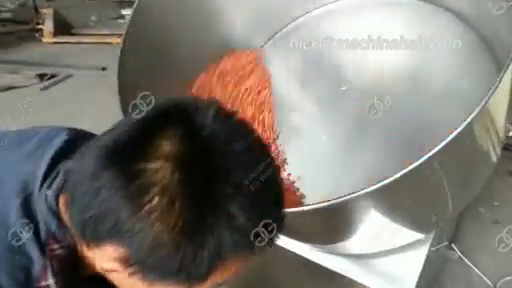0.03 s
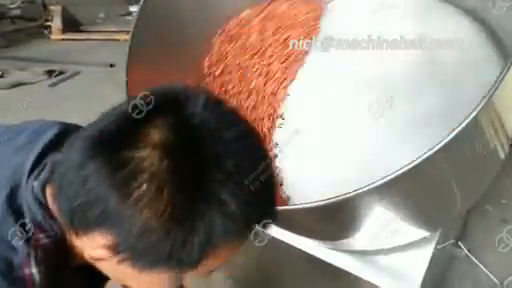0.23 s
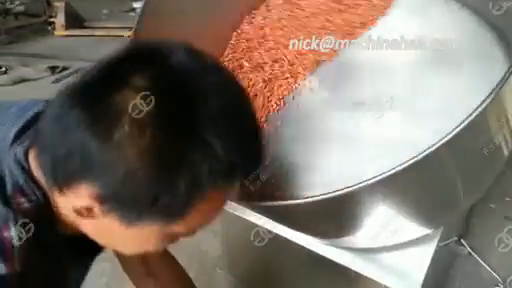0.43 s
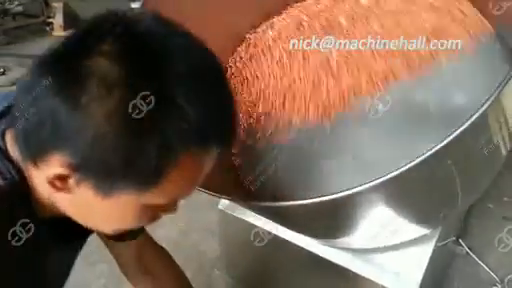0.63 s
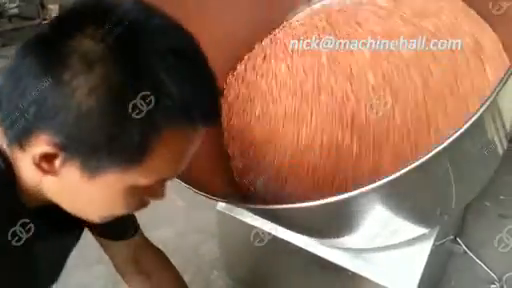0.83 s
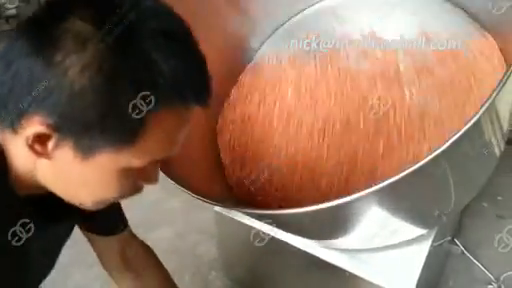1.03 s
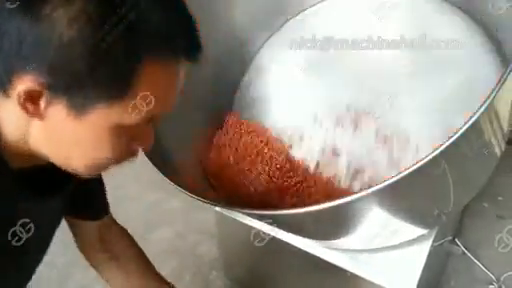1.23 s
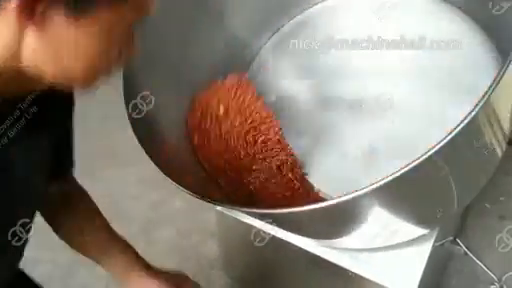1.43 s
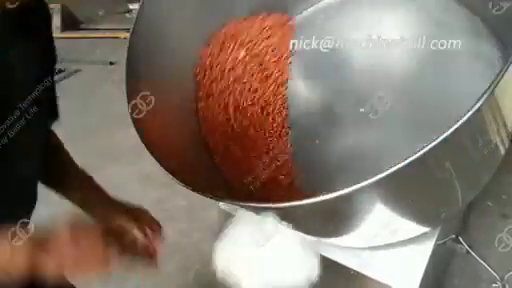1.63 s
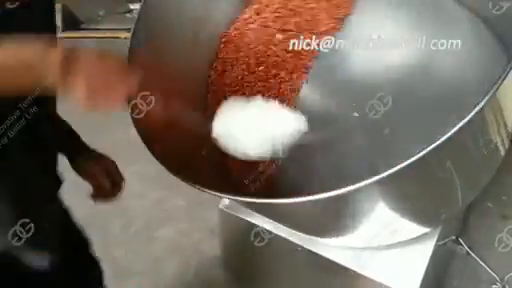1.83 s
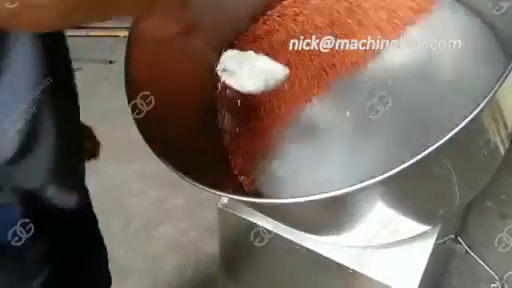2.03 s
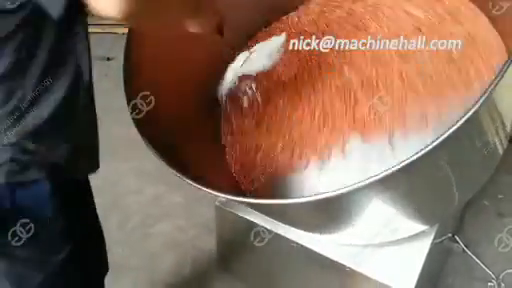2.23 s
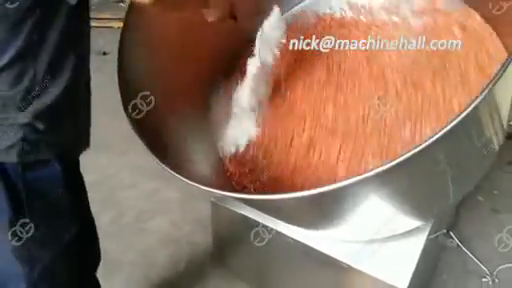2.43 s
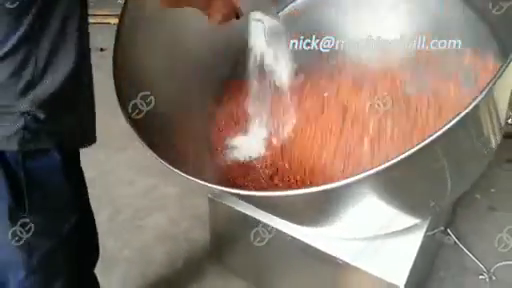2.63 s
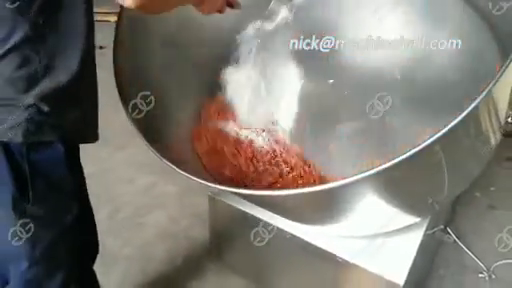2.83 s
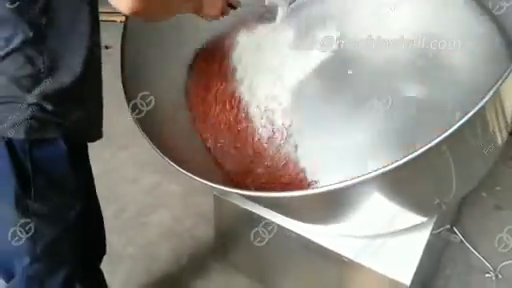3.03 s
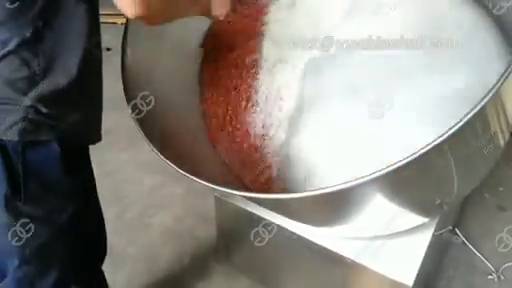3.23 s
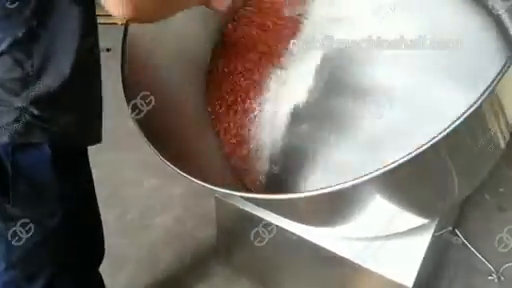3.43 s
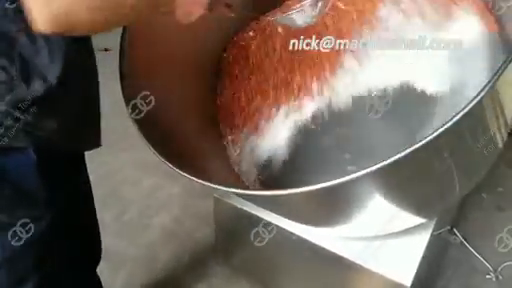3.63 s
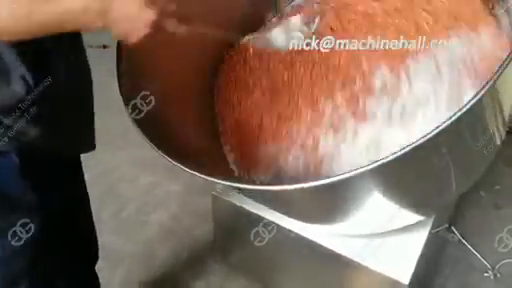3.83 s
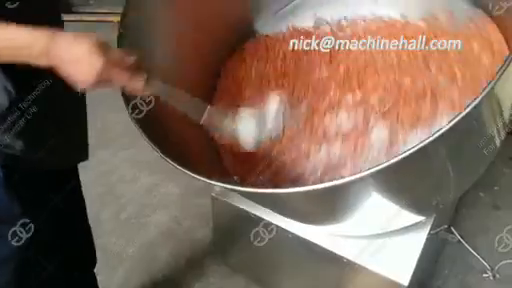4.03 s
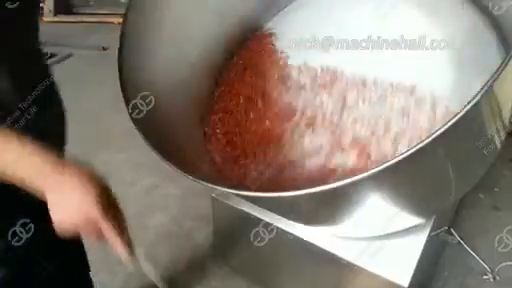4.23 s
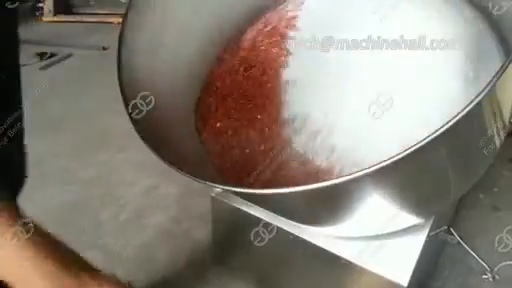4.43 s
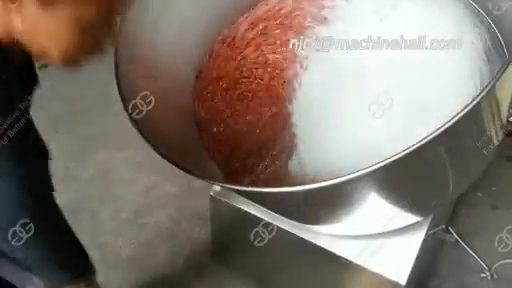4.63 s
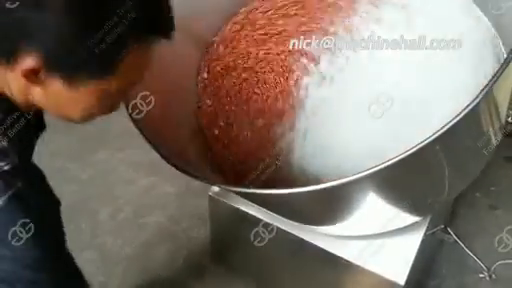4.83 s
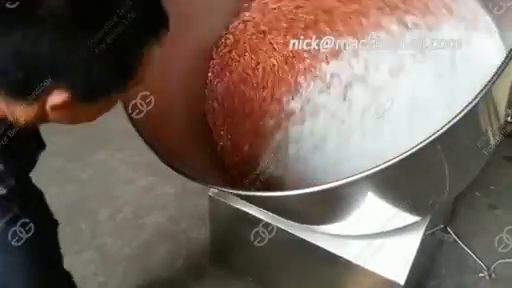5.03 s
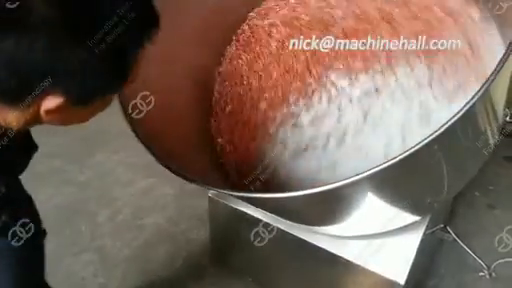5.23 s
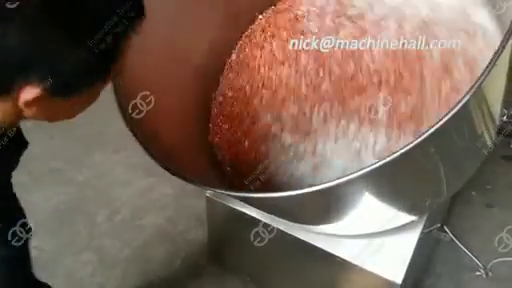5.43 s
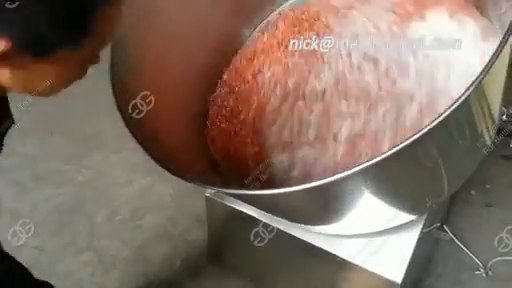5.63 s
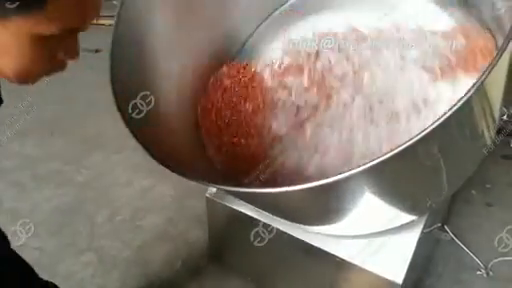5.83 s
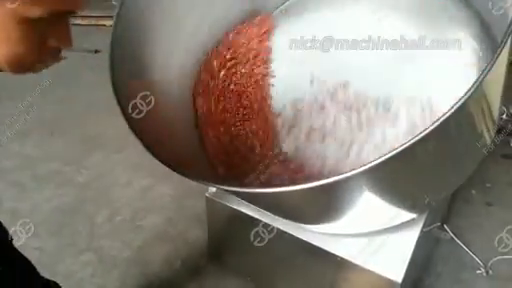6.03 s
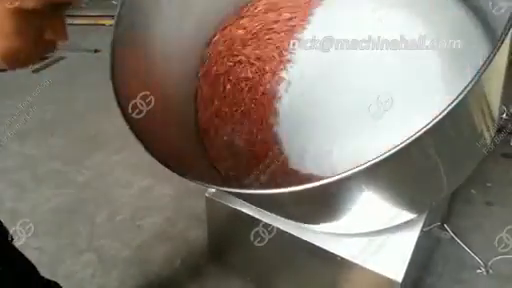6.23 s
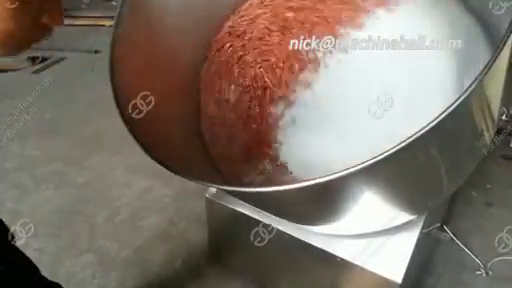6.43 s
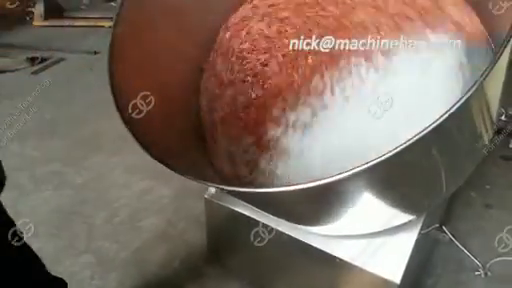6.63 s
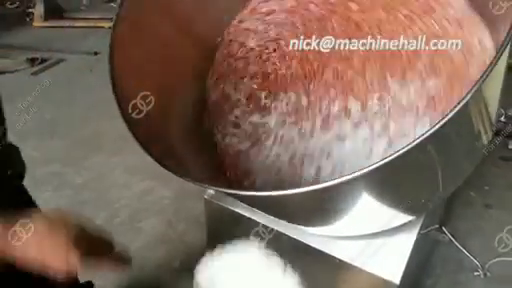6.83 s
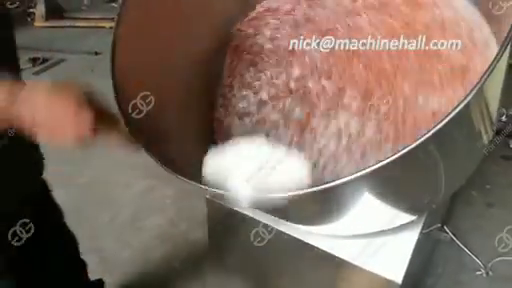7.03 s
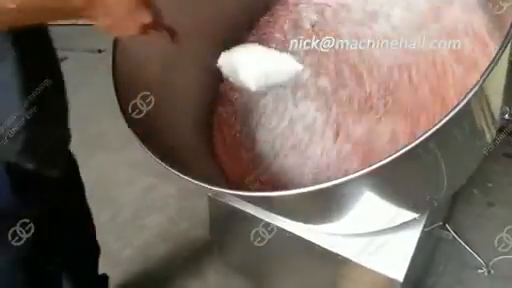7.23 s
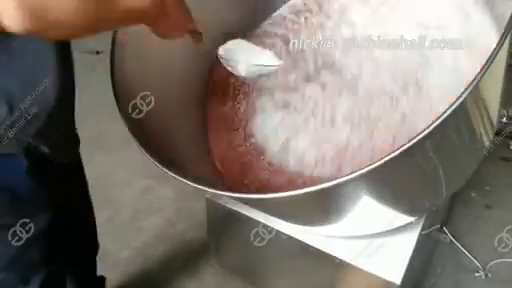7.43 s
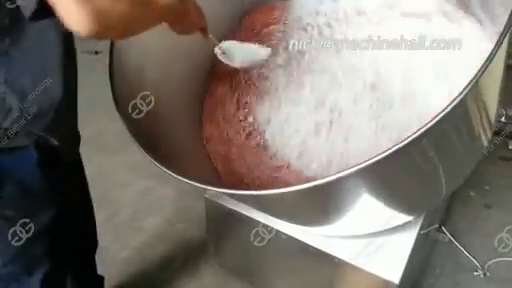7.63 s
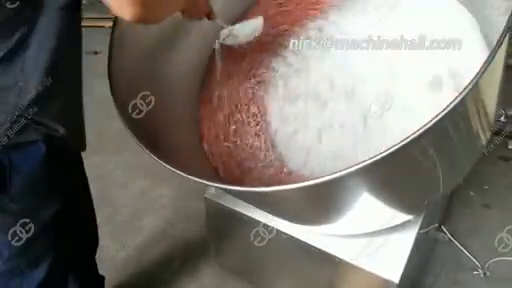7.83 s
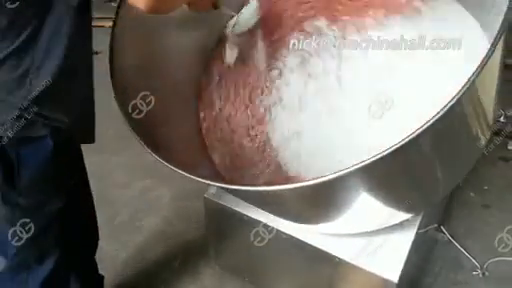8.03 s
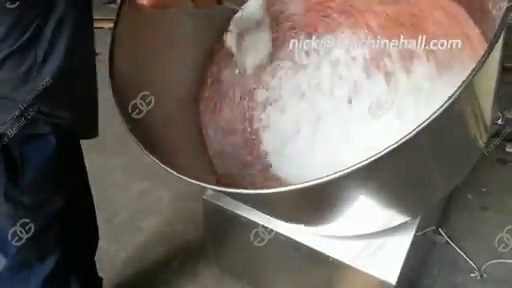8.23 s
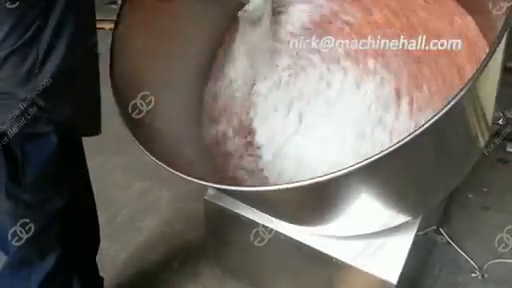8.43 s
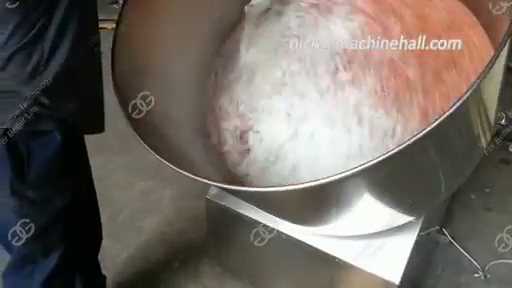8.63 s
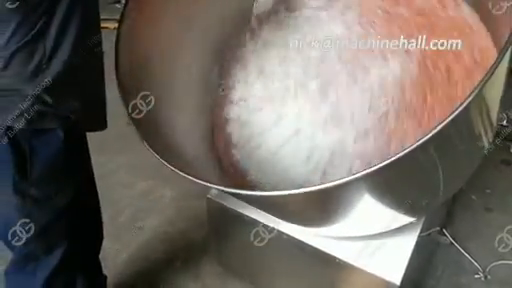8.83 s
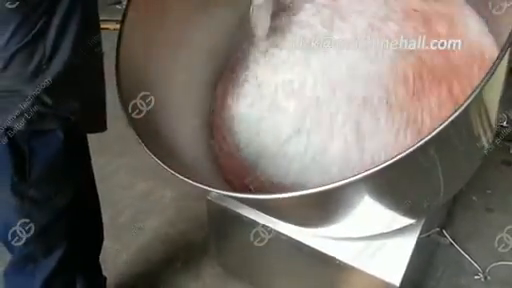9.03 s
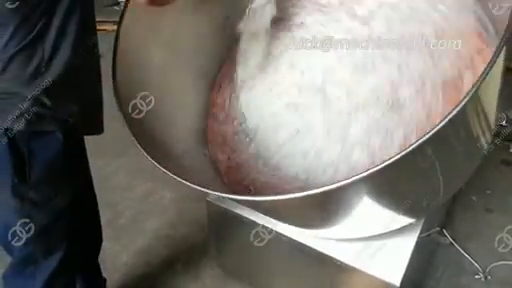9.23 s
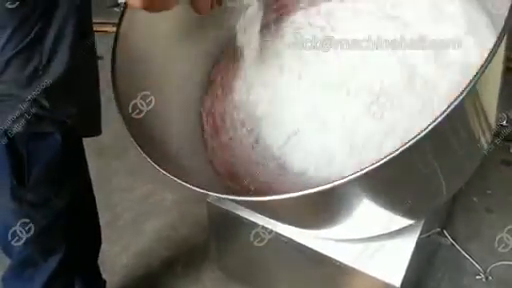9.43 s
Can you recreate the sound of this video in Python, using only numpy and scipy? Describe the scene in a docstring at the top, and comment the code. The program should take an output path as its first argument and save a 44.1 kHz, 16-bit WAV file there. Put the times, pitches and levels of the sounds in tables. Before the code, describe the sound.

Peanuts slide and rattle in a turning steel pan, surging about every second and a half over a motor hum and factory rumble.

```python
"""A dense rush of tiny collisions about every second and a half: peanuts sliding in a tilted steel pan.
On a factory floor, the turning pan of a coating machine carries the heap up its wall and lets it go.
The nuts thud, drum, hiss and clack, and the steel rings; the drive hums and the hall rumbles below.
The near microphone is squeezed and slightly overloaded by each slide; the far one is shaded."""
import sys
import numpy as np
from scipy import signal
from scipy.fft import rfft, irfft
from scipy.io import wavfile
from scipy.ndimage import uniform_filter1d

SR = 44100
rng = np.random.default_rng(int(sys.argv[2]) if len(sys.argv) > 2 else 0)


def put_to_file(sound):
    """Save the sound as 16-bit audio at rate SR, in the file named by the first command-line argument."""
    columns = np.atleast_2d(sound).T  # one column per channel
    safe = np.clip(columns, -1, 1)
    whole_steps = np.round(safe * 32767)
    wavfile.write(sys.argv[1], SR, whole_steps.astype(np.int16))


N = 418950
TIME = np.arange(N) / SR
HZ = np.maximum(np.arange(N // 2 + 1) * SR / N, 1)
SLIDE_RELEASE_S, SPILL_RELEASE_S = .06, .085
ROLL_DRUM_DB, ROLL_SKITTER_DB = -27.5, -26   # flow of the nuts that keep rolling between slides


def nuts():
    """The tumbling load, close up: one flow of nuts sounds the heap, the pan and its free wall."""
    drum_db, skitter_db = flows()
    surge_db = drum_db - ROLL_DRUM_DB
    return heap_thud(surge_db) + pan_drum(drum_db) + wall_ring(surge_db) + skitter(skitter_db, surge_db)


# The heap slides down the wall, then stragglers run after it:
# start_s, length_s, drum_db, skitter_db, drum_swell_db_per_s, run_out_s, run_out_db
SLIDES = [(0.67, .3, -15, -9.5, 10, .55, -24), (2.168, .27, -17.5, -9.5, 28, .57, -25.5),
          (3.762, .215, -13, -12, 2.5, .62, -24), (5.085, .323, -13.5, -11.5, 10, .46, -21),
          (6.595, .39, -14.5, -14.5, 4, .63, -21), (8.248, .315, -16.5, -17.5, 10, .62, -22.5)]
# Small spills between the slides: start_s, length_s, drum_db, skitter_db
SPILLS = [(0.455, .2, -28, -21.5), (1.255, .06, -22, -22.5), (1.79, .1, -27, -28), (1.89, .07, -21, -18.5),
          (1.983, .19, -22.5, -23.5), (2.73, .245, -19.5, -22), (3.286, .1, -29, -23), (3.44, .1, -28, -27),
          (4.259, .094, -19.5, -27), (4.52, .08, -27, -29), (4.805, .08, -22, -19.5),
          (4.929, .07, -19, -16.5), (5.99, .09, -19, -24), (6.13, .17, -24, -24.5),
          (7.94, .15, -21.5, -23.5), (9.335, .16, -22.5, -34)]
# Vigour of the rolling: time_s, gain_db
ROLLING = [(0, -2), (.22, -7), (.45, -1.5), (1.7, -2), (3.2, -1), (4.7, 0), (6.3, 1.5), (6.55, -2),
           (7.7, 2), (7.9, 1), (9.5, 2.5)]

def flows():
    """Relative levels in dB of drumming and skittering: rolling, slides and spills add in power."""
    rolling_db, = in_time(ROLLING)
    drum = from_db(ROLL_DRUM_DB + rolling_db) ** 2
    hiss = from_db(ROLL_SKITTER_DB + .3 * rolling_db) ** 2
    for start, length, drum_db, skitter_db, swell, run_out_s, run_out_db in SLIDES:
        end = start + length
        stragglers = from_db(run_out_db) ** 2 * rush(end, run_out_s, SPILL_RELEASE_S, swell_db_per_s=-8)
        drum += from_db(drum_db) ** 2 * rush(start, length, SLIDE_RELEASE_S, swell, crest_db=5.5)
        drum += stragglers
        hiss_swell = 15 - 1.25 * swell   # the hiss gives way as the bulk lands and the drumming swells
        hiss += from_db(skitter_db) ** 2 * rush(start, length, SLIDE_RELEASE_S, hiss_swell, crest_db=5.5)
        hiss += from_db(-.06 - .38 * end) ** 2 * stragglers   # they hiss less as flour coats them
    for start, length, drum_db, skitter_db in SPILLS:
        spill = rush(start, length, SPILL_RELEASE_S)
        drum += from_db(drum_db) ** 2 * spill
        hiss += from_db(skitter_db) ** 2 * spill
    return 10 * np.log10([drum, hiss])


def rush(start, length, release_s, swell_db_per_s=0, crest_db=0, attack_s=.064):
    """Power of one rush of nuts: a quick rise, a hold that may swell, fade or crest, and a dying tail."""
    power = np.zeros(N)
    sounding = (TIME > start) & (TIME < start + length + 10 * release_s)
    age = TIME[sounding] - start
    rise = np.minimum(age / attack_s, 1)
    crest = np.exp(-((age - .65 * length) / .055) ** 2)   # the bulk comes down
    hold = from_db(swell_db_per_s * (np.minimum(age, length) - length / 2) + crest_db * crest)
    tail = np.exp(-np.maximum(age - length, 0) / release_s)
    power[sounding] = (rise * hold * tail) ** 2
    return power


def collisions(level_db, modes, per_s, clump_db, clump_hz):
    """Nuts strike at random, in clumps; a louder rush is more strikes, `per_s` on average."""
    flow = from_db(level_db + clump_db * drift(clump_hz)) ** 2
    strikes = rng.poisson(flow / flow.mean() * per_s / SR)
    clicks = np.sqrt(strikes) * rng.standard_normal((2, N))
    return np.sqrt(flow.mean()) * at_microphones(*clicks, resonances(modes))


# Resonances of nuts skimming the steel: pitch_hz, width_hz, gain_db
SKITTER_MODES = [(1954, 1490, 2.5), (2630, 460, -2.5), (3165, 630, 0), (3940, 1620, -0.5), (4600, 4600, -7),
                 (8800, 8600, -9.5)]

def skitter(skitter_db, surge_db):
    """Loose nuts hiss across the steel: a faster rush is brighter, nuts landing on nuts are duller."""
    hiss = collisions(skitter_db, SKITTER_MODES, per_s=300000, clump_db=1.06, clump_hz=28)
    hardness_db = .5 + .6344 * (skitter_db - ROLL_SKITTER_DB) - .59 * surge_db
    soft = low_pass(hiss, hz=3640, order=5)
    return from_db(1.3) * (soft + from_db(hardness_db) * (hiss - soft))


# Resonances of the struck pan: pitch_hz, width_hz, gain_db
PAN_MODES = [(1420, 580, -2), (1563, 400, 2), (1840, 1410, -8)]

def pan_drum(drum_db):
    """Falling nuts drum on the steel pan."""
    return from_db(-2.5) * collisions(drum_db, PAN_MODES, per_s=50000, clump_db=1.2, clump_hz=22)


# Resonances of the heap: pitch_hz, width_hz, gain_db
HEAP_MODES = [(604, 188, 0), (788, 32, -2), (925, 430, -5.5), (1070, 73, 2.5), (1197, 140, 0)]

def heap_thud(surge_db, settle_s=.2, lag_s=.12, flour_db_per_s=.3575):
    """The heap settles slowly, swelling after the drumming, and thuds more as flour coats it."""
    settling_db = uniform_filter1d(surge_db, int(settle_s * SR))
    late_db = np.interp(TIME - lag_s, TIME, settling_db)
    level_db = -33.5 + flour_db_per_s * TIME + .48 * late_db
    return collisions(level_db, HEAP_MODES, per_s=12000, clump_db=1.11, clump_hz=14)


# Resonances of the pan's free wall: pitch_hz, width_hz, gain_db
WALL_MODES = [(615, 50, 0.5), (775, 25, -9.5), (1067, 78, -0.5)]

def wall_ring(surge_db):
    """The free wall rings on; damped by the load, it follows only part of the drumming's swing."""
    return collisions(-39.5 + .4 * surge_db, WALL_MODES, per_s=8000, clump_db=1.37, clump_hz=10)


# Bursts of nut against nut, then of nuts on bare steel: start_s, length_s, level_db
CLACKS = [(1.91, 0.23, -24.5), (3.38, .24, -27.5), (3.777, .18, -20.5), (4.28, .09, -24.5),
          (6.61, .22, -14.5), (6.9, .1, -14.5), (8.32, .17, -18.5), (8.917, .06, -26)]
RATTLES = [(.72, .22, -18), (2.19, .15, -13), (3.83, .16, -17), (5.09, .14, -17.5), (6.77, .19, -19),
           (8.36, .08, -18.5)]
# Resonances of those two contacts: pitch_hz, width_hz, gain_db
CLACK_MODES = [(1970, 850, 0)]
RATTLE_MODES = [(2540, 140, -6.5), (3280, 310, 2), (4010, 570, 0.5), (4450, 260, 3), (4900, 320, -16)]

def clatter():
    """Nuts clack against each other, and the front of a slide rattles brightly on bare steel."""
    clacks = collisions(bursts_db(CLACKS), CLACK_MODES, per_s=30000, clump_db=.14, clump_hz=25)
    rattles = collisions(bursts_db(RATTLES), RATTLE_MODES, per_s=900, clump_db=1.45, clump_hz=35)
    return clacks + rattles


def bursts_db(rows):
    """Level in dB of a row of short rushes."""
    power = sum(from_db(db) ** 2 * rush(start, length, SLIDE_RELEASE_S) for start, length, db in rows)
    return 10 * np.log10(power + 1e-12)


# The pan's main ring, clearest after a slide, and its high ring: time_s, pitch_hz, level_db
MAIN_RING = [(0, 1620, -33), (.25, 1620, -46), (.85, 1600, -28), (1.15, 1670, -32), (1.37, 1648, -21),
             (1.62, 1630, -40), (2.0, 1600, -33), (2.22, 1640, -30), (2.34, 1600, -9), (2.46, 1590, -22.5),
             (2.62, 1565, -40), (2.84, 1592, -20.5), (3, 1610, -25.5), (3.12, 1620, -38), (3.7, 1630, -39),
             (3.92, 1640, -18), (4.12, 1620, -25.5), (4.35, 1602, -25.5), (4.68, 1545, -36),
             (4.87, 1590, -28.5), (5.25, 1650, -20), (5.5, 1630, -28.5), (5.8, 1592, -34.5),
             (6.22, 1565, -28), (6.5, 1570, -42), (7.15, 1648, -25.5), (7.55, 1635, -28), (7.9, 1590, -37),
             (8.05, 1605, -25), (8.22, 1600, -28), (8.5, 1590, -18), (8.8, 1638, -27), (9.15, 1658, -28),
             (9.5, 1645, -22.5)]
HIGH_RING = [(0, 4091, -54), (.9, 3945, -40), (1.4, 4130, -39), (2.1, 4144, -40), (2.7, 4080, -36),
             (3.2, 4044, -49), (3.45, 3830, -34), (3.75, 3944, -39), (4.25, 4030, -35), (4.7, 4000, -39),
             (5.4, 4120, -39), (5.75, 4010, -46), (6.15, 4080, -36), (6.45, 4120, -36), (6.9, 4030, -29),
             (7.6, 4120, -38), (9.5, 4100, -44)]
# Other modes that ring for a moment: start_s, length_s, pitch_hz, width_hz, level_db
BRIEF_RINGS = [(.48, 0.27, 4520, 110.4, -36), (2.2, 0.17, 4490, 130, -24), (2.8, 0.16, 806, 70, -30.5),
               (5.42, 0.7, 1075, 92, -33), (5.87, .08, 3760, 110, -32), (6.02, 0.047, 1258, 80, -25),
               (6.7, 0.51, 797, 50, -39), (7.2, 0.29, 803, 60.3, -35), (7.52, 0.14, 1452, 44.5, -28),
               (8.148, 0.18, 1233, 60, -29), (8.38, 0.25, 803, 55, -30), (8.833, 0.18, 1062, 80, -31)]

def singing_pan(flutter_db=1.8):
    """Two rings glide as the pan turns and the load moves, fluttering as nuts touch; others come and go."""
    out = np.zeros((2, N))
    for curve, width_hz in (MAIN_RING, 118), (HIGH_RING, 135):
        hz, level_db = in_time(curve)
        out += ring(hz, width_hz, from_db(level_db + flutter_db * drift(12)))
    for start, length, hz, width_hz, level_db in BRIEF_RINGS:
        power = rush(start, length, SPILL_RELEASE_S)
        sounding = power > 0
        out[:, sounding] += ring(hz, width_hz, from_db(level_db) * np.sqrt(power[sounding]))
    return out


def ring(hz, width_hz, gain):
    """One mode kept ringing by many small strikes, at both microphones; `hz` may glide."""
    pole = np.exp(-np.pi * width_hz / SR)
    strikes = rng.standard_normal((2, len(gain))) + 1j * rng.standard_normal((2, len(gain)))
    swing = signal.lfilter([1], [1, -2 * pole, pole ** 2], strikes)
    direct, scattered = swing * np.exp(2j * np.pi * np.cumsum(hz * np.ones(len(gain))) / SR)
    level_db, likeness, lag = far_mic_at(np.mean(hz))
    far = likeness * np.exp(-1j * lag) * direct + np.sqrt(1 - likeness ** 2) * scattered
    return gain * np.real([direct, from_db(level_db) * far]) / np.std(direct.real)


# Lone thin ticks in the treble: time_s, level_db
TICKS = [(0.711, -24), (0.786, -24), (1.112, -36), (1.174, -52), (1.311, -38), (1.833, -30), (2.202, -26),
         (2.255, -15), (2.794, -29), (2.827, -30), (2.868, -32), (3.005, -35), (4.348, -30.5), (4.379, -36),
         (4.879, -37), (4.942, -48), (4.989, -25), (5.105, -27), (5.555, -36), (6.325, -35), (7.091, -40),
         (7.142, -35), (7.203, -35), (7.216, -39), (7.276, -36), (7.301, -46), (8.279, -26), (9.305, -46),
         (9.39, -41.5)]

def ticks(repeat_s=.0077, snap_s=.0022, tail_s=.016):
    """Ticks above the rush, on the near microphone only: each has a weaker second tick and a faint tail."""
    time_s, level_db = np.transpose(TICKS)
    second_s = time_s + repeat_s * rng.uniform(.7, 1.3, len(time_s))
    clicks = np.zeros(N)
    clicks[(time_s * SR).astype(int)] = from_db(level_db)
    clicks[(second_s * SR).astype(int)] += from_db(level_db - 10.5)
    snap, tail = (signal.lfilter([1], [1, -np.exp(-1 / (decay_s * SR))], clicks + 1e-18)
                  for decay_s in (snap_s, tail_s))
    bursts = (snap + from_db(-24) * tail) * rng.standard_normal(N)
    treble = signal.butter(2, [5630, 11900], "band", fs=SR, output="sos")
    return np.array([signal.sosfilt(treble, bursts), np.zeros(N)])


# The drive's strongest line: time_s, level_db
MAIN_HUM = [(0, -39.5), (.3, -42), (.8, -45), (1.0, -37), (1.3, -45), (1.87, -37), (2.03, -49), (2.3, -41),
            (2.52, -36), (2.85, -48), (3.1, -41), (3.4, -39.5), (3.75, -50), (4.25, -38), (4.55, -42),
            (4.8, -36.5), (5.2, -42), (5.55, -36), (5.85, -46), (6.05, -36.5), (6.25, -40), (6.65, -48),
            (7.3, -43.5), (8.2, -52), (8.52, -41), (8.85, -49), (9.13, -41), (9.5, -46)]
# Its other lines, whose balance shifts once: pitch_hz, early_db, late_db, wander_rad
HUM_LINES = [(71.4, -53.5, -51, 1.3), (95.3, -49.5, -48, 1.8), (121.5, -48.5, -51, 1.4),
             (185, -44.5, -46.5, 2.3), (374.6, -50, -59, 0.99)]

def drive(main_hz=247, waver_db=3.0, shift_s=(5.4, 6.1), far_db=-1.0):
    """Motor and gear lines waver under the shifting load; the strongest comes and goes."""
    main_db, = in_time(MAIN_HUM)
    out = hum_line(main_hz, main_db + .5 * waver_db * drift(8.9), wander_rad=1.1)
    for hz, early_db, late_db, wander_rad in HUM_LINES:
        level_db = np.interp(TIME, shift_s, [early_db, late_db])
        out += hum_line(hz, level_db + waver_db * drift(7.5), wander_rad)
    return out * from_db([[0], [far_db]])


def hum_line(hz, level_db, wander_rad):
    """One line of the drive, wandering in phase and reaching the far microphone later."""
    phase = 2 * np.pi * hz * TIME + wander_rad * drift(4.4)
    _, _, lag = far_mic_at(hz)
    return np.sqrt(2) * from_db(level_db) * np.sin([phase, phase - lag])


# Room tone of the factory hall: frequency_hz, gain_db
HALL_SPECTRUM = [(20, -27), (48, -21.5), (85, -7.5), (145, -8), (240, -2), (400, -2.5), (700, -6.5),
                 (1500, -22.5), (5500, -18)]

def hall(level_db=-27):
    """Steady rumble of machines in the hall around both microphones."""
    spectrum_db, = in_frequency(HALL_SPECTRUM)
    return from_db(level_db) * at_microphones(*rng.standard_normal((2, N)), from_db(spectrum_db))


# The far microphone against the near one: frequency_hz, level_db, likeness (0-1), lag_rad
FAR_MIC = [(70, 0, .92, .4), (130, -1, .91, .4), (250, -3.3, .9, .6), (450, -5.1, .72, .7),
           (620, -6.5, .8, .8), (850, -7.3, .58, .6), (1150, -9, .48, .8), (1600, -11.8, .52, 2),
           (2000, -17, .41, 1.6), (2700, -20, .1, 2.6), (3800, -26.5, .11, 4.8), (5200, -27, .14, 3.7)]

def at_microphones(direct, scattered, colour):
    """The near side has rms 1; the far side is duller, later and mostly scattered sound in the treble."""
    level_db, likeness, lag = in_frequency(FAR_MIC)
    shade = colour * from_db(level_db)
    near = shaped(direct, colour)
    far = shaped(direct, shade * likeness * np.exp(-1j * lag))
    far += shaped(scattered, shade * np.sqrt(1 - likeness ** 2))
    return np.array([near, far]) / np.std(near)


def far_mic_at(hz):
    """Level, likeness and lag of one pitch at the far microphone."""
    mic_hz, *columns = np.transpose(FAR_MIC)
    return [np.interp(hz, mic_hz, column) for column in columns]


def from_db(db):
    """Decibels to gain."""
    return 10 ** (np.asarray(db) / 20)


def in_time(rows):
    """Each column of a curve at every sample."""
    time_s, *columns = np.transpose(rows)
    return [np.interp(TIME, time_s, column) for column in columns]


def in_frequency(rows):
    """Each column of a spectrum at every frequency."""
    hz, *columns = np.transpose(rows)
    return [np.interp(np.log(HZ), np.log(hz), column) for column in columns]


def shaped(x, gain):
    """Filter by a gain per frequency."""
    return irfft(rfft(x) * gain, N)


def low_pass(x, hz, order):
    """Flat below `hz`, falling 6 dB an octave per order above."""
    return shaped(x, 1 / np.sqrt(1 + (HZ / hz) ** (2 * order)))


def drift(rate_hz):
    """Slow chance with an rms of 1, changing about `rate_hz` times a second."""
    slow = shaped(rng.standard_normal(N), 1 / (1 + (HZ / rate_hz) ** 2))
    return slow / np.sqrt(np.mean(slow ** 2))


def resonances(modes):
    """Gain per frequency of overlapping resonances whose powers add."""
    peaks = (from_db(db) / (1 + (2 * (HZ - hz) / width) ** 2) for hz, width, db in modes)
    return np.sqrt(sum(peak ** 2 for peak in peaks))


def scene():
    """The load, the pan, the drive and the hall, as near and far channels."""
    return nuts() + clatter() + singing_pan() + drive() + hall()


def treble_gate(x, threshold_db, range_db, open_db, edge_hz=5490):
    """Treble above the band edge passes only while its channel is loud."""
    band = low_pass(x, edge_hz, order=120)
    level_db = 10 * np.log10(uniform_filter1d(band ** 2, size=1300, mode="wrap") + 1e-12)
    opening = np.clip((level_db - threshold_db) / range_db, 0, 1)
    return band + from_db(open_db) * opening * (x - band)


def gain_control(x, threshold_db, squeeze, window_s):
    """Both channels are turned down while the near hiss is loud, so the rumble sinks under each slide."""
    hiss = shaped(x[0], HZ > 2400)
    power = uniform_filter1d(hiss ** 2, int(window_s * SR), mode="wrap")
    over_db = np.maximum(10 * np.log10(power + 1e-12) - threshold_db, 0)
    return x * from_db(-squeeze * over_db)


def overload(x, knee, headroom):
    """Peaks that swing below -knee are flattened."""
    return np.maximum(x, -knee) + headroom * np.tanh(np.minimum(x + knee, 0) / headroom)


# The level dips for an instant on both microphones: time_s, half_length_s
DIPS = [(5.293, 0.021), (5.375, 0.02), (7.018, 0.018)]

def record(dry):
    """The recorder: a narrow band, gain control and lopsided overload, with thin ticks and brief dips."""
    x = treble_gate(dry, threshold_db=-17, range_db=5.5, open_db=-22)
    x = gain_control(x, threshold_db=-17.1, squeeze=.88, window_s=.08)
    x = overload(x, knee=.425, headroom=.03)
    x = -overload(-x, knee=.7, headroom=.2)   # upward peaks flatten later and more gently
    x = treble_gate(x, threshold_db=-16, range_db=2.6, open_db=1)   # loud stretches crackle on top
    x = x + ticks()
    for time_s, half_length_s in DIPS:
        x = x * np.clip(np.abs(TIME - time_s) / half_length_s, .27, 1)
    x = shaped(x, 1 / np.sqrt(1 + (45 / HZ) ** 4))   # low cut at 45 Hz
    x = low_pass(x, hz=12800, order=3)
    return low_pass(x, hz=15800, order=80)


dry = scene()
out = record(dry)
put_to_file(out)
```